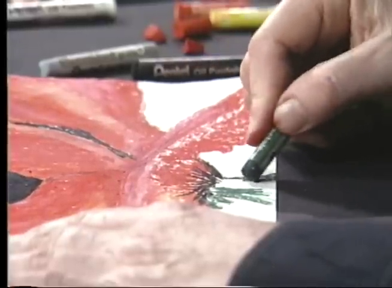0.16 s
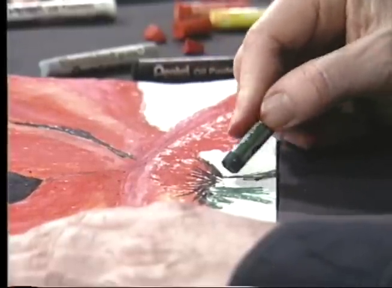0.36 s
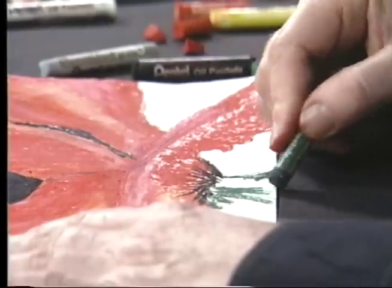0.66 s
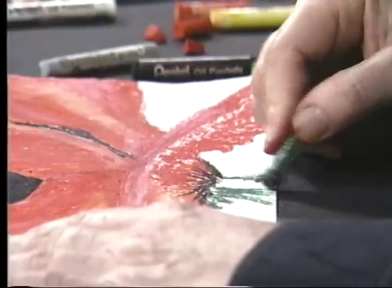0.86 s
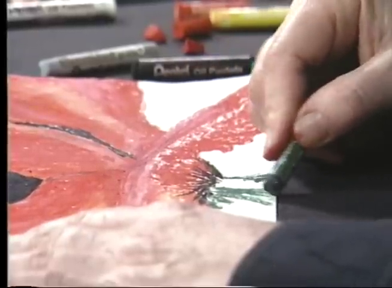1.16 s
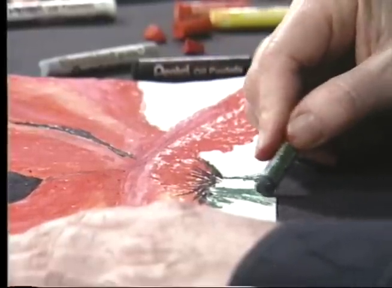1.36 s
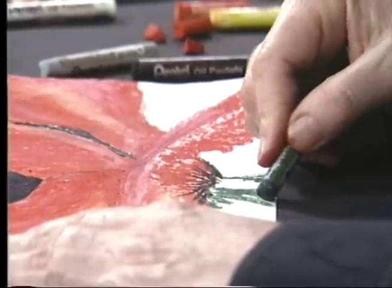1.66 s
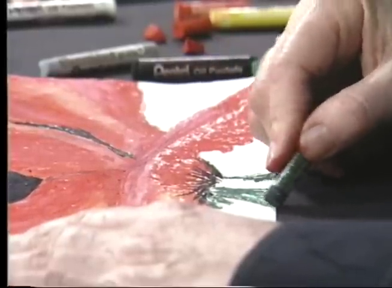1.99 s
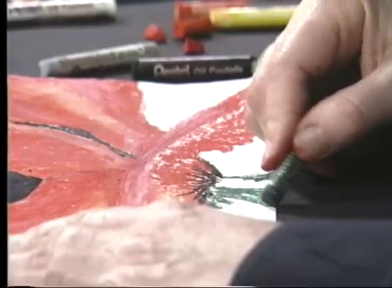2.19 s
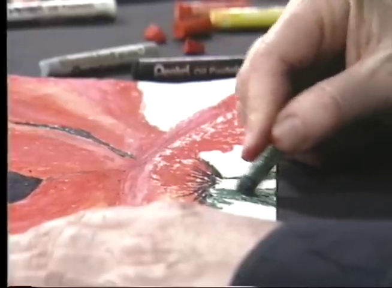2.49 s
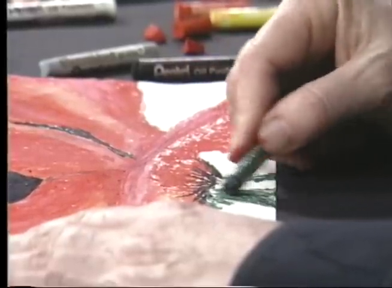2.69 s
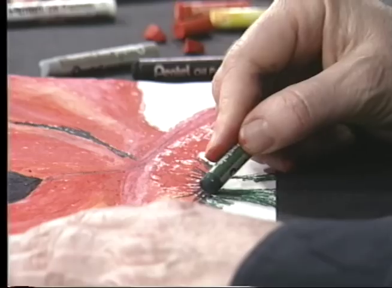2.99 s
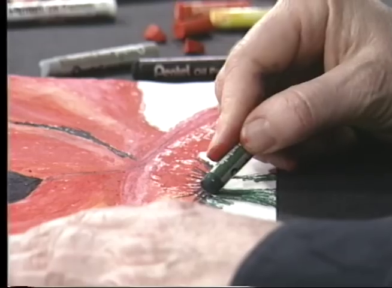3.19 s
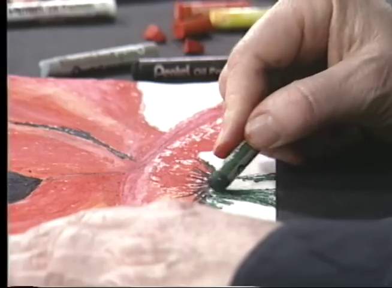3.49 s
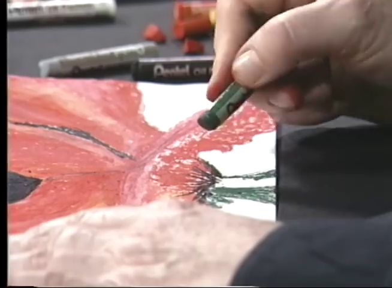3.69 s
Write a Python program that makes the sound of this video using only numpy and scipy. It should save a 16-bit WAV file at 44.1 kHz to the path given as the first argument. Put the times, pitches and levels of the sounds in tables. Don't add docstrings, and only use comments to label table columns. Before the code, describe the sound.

An oil pastel scratches paper in short, quick strokes, with a sharp knock near the first second and a few fainter taps; steady low hum and thin high whistle, one close microphone in a quiet room.

```python
import sys
import numpy as np
from scipy import signal
from scipy.fft import rfft, irfft
from scipy.io import wavfile

SR = 44100
rng = np.random.default_rng(int(sys.argv[2]) if len(sys.argv) > 2 else 0)


def voltage_ratio(level):
    return 10 ** (np.asarray(level, float) / 20)


def transcribe(signal):
    frames = np.atleast_2d(signal).T
    limited = np.clip(frames, -1, 1)
    pcm = np.round(limited * 32767).astype(np.int16)
    wavfile.write(sys.argv[1], SR, pcm)


N = 169785

# frequency_hz, level_db (per Hz)
NOISE_FLOOR = [(15, -87.5), (40, -69.5), (60, -74.5), (70, -77.5), (950, -102.5), (1080, -102.5),
               (3200, -105.5), (15000, -107.5)]
# harmonic_number, level_db (rms)
MAINS_HARMONICS = [(1, -64), (2, -76), (3, -52.7), (4, -85), (5, -61.5), (6, -75), (7, -74), (8, -83),
                   (9, -68.5), (11, -76.5), (13, -78), (15, -71.5), (17, -80), (19, -94), (21, -87),
                   (23, -94), (27, -85), (31, -90), (33, -87), (39, -88), (45, -88), (55, -93), (57, -94)]
# pitch_hz, level_db (rms)
IDLE_TONES = [(86.13, -78), (480, -108), (600, -101), (8991, -102)]
# time_s (the swell peaks 1.2 ms later), level_db
IDLE_BLIPS = [
    (1.962, -60),
    (2.008, -59),
    (2.149, -59),
    (2.171, -59),
    (2.452, -60),
    (2.495, -59),
    (2.592, -60),
    (2.614, -59),
]
# start_s, level_db
HAND_BUMPS = [
    (.095, -48),
    (0.429, -38),
    (1.3, -42),
    (1.389, -39),
    (1.6, -55),
    (2.45, -55),
    (2.748, -65),
    (3.352, -47),
    (3.68, -59),
]
# start_s, level_db, t60_s, low_hz, high_hz
HAND_SHIFTS = [
    (.89, -61.5, 6, 500, 900),
    (.89, -67, 1.5, 1000, 2400),
    (3.55, -68, 6, 400, 1000),
]
# start_s, tick_db, thud_db, brightest_hz, rattle_ms
DESK_TAPS = [
    (.469, -55.5, -64, 616, 3.2),
    (0.8611, -52, -58, 1320, 2.6),
    (.8645, -48.5, -65, 804, 5.9),
    (0.8824, -43.5, -36.5, 2070, .4),
    (1.321, -51.5, -58, 690, 7),
    (1.639, -56, -60, 700, 5.9),
    (1.935, -64, -62, 1620, 2),
    (3.691, -55, -62, 2600, 3),
    (3.708, -56, -64, 1500, 7),
    (3.72, -56, -66, 900, 2.4),
]
# pitch_hz, level_db, t60_s
DESK_MODES = [(430, -2, .022), (580, 0, .025), (720, 1, .025), (940, -2, .018), (1200, -3, .014),
              (1480, -2, .012), (1800, 1, .012), (2150, 0, .010), (2600, -4, .008), (3280, -1, .022),
              (4800, -5, .004)]
# pitch_hz, level_db, t60_s
THUD_MODES = [(65, -3, .08), (110, 0, .07), (230, -5, .025)]
# middle_s, length_s, level_db
STROKES = [(.022, .04, -72), (0.092, .06, -66), (0.16, .05, -67), (.499, .06, -71),
           (0.763, 0.063, -67), (.845, 0.042, -64), (0.92, 0.087, -67), (0.998, 0.068, -62),
           (1.074, 0.067, -68), (1.15, 0.063, -62.5), (1.228, 0.11, -67.5), (1.305, 0.063, -61),
           (1.402, 0.13, -66.5), (1.491, 0.064, -64), (1.562, 0.073, -67), (1.653, 0.061, -63.5),
           (1.758, 0.034, -69), (1.828, 0.06, -64.5), (1.902, .06, -66.5), (1.995, 0.082, -64),
                 (2.085, 0.082, -65), (2.167, 0.059, -63), (2.255, 0.078, -65), (2.338, 0.067, -62.5),
                 (2.438, 0.11, -65), (2.556, 0.062, -61), (2.648, 0.12, -64), (2.758, 0.054, -61),
                 (2.841, 0.071, -63), (2.892, 0.061, -64.5), (3.452, 0.066, -67.5), (3.523, .07, -72),
                 (3.618, 0.096, -66.5), (3.703, 0.064, -64), (3.83, 0.12, -63.5)]
# pitch_hz, width_hz, level_db
PAPER_MODES = [(4950, 460, -2.5), (6100, 1000, 0), (8300, 1100, -5), (11500, 4000, -7), (4300, 850, -9)]
TRACK_OFFSET = [
    [.03249],
    [.04352],
]

MAINS_HZ = 60


def in_hz(points, hz):
    p = np.array(points)
    return np.interp(np.log(hz + 1), np.log(p[:, 0]), p[:, 1])


def rms_one(x):
    return x / np.sqrt(np.mean(x ** 2) + 1e-20)


def drift(rate_hz):
    r = np.exp(-80 * np.pi * rate_hz / SR)
    slow = signal.lfilter([1], [1, -2 * r, r * r], rng.standard_normal(N // 40 + 2002))
    slow = rms_one(slow[2000:])
    return np.interp(np.arange(N) / 40, np.arange(len(slow)), slow)


def ring(x, hz, t60_s):
    r, w = voltage_ratio(-60 / (t60_s * SR)), 2 * np.pi * hz / SR
    return signal.lfilter([0, np.sin(w)], [1, -2 * r * np.cos(w), r * r], x)


def peak(x, hz, width_hz):
    r = np.exp(-np.pi * width_hz / SR)
    zeros = np.array([1, 0, -1]) * (1 - r * r) / 2
    return signal.lfilter(zeros, [1, -2 * r * np.cos(2 * np.pi * hz / SR), r * r], x)


def peak_twice(x, hz, width_hz):
    return peak(peak(x, hz, width_hz), hz, width_hz)


def room_and_tape_noise():
    hz = np.arange(N // 2 + 1) * SR / N
    shaped = rfft(rng.standard_normal(N)) * voltage_ratio(in_hz(NOISE_FLOOR, hz)) * np.sqrt(SR / 2)
    low = 1 / (1 + (hz / 80) ** 4)
    rumble = irfft(shaped * low, N) * voltage_ratio(1.5 * drift(3.7))
    hiss = irfft(shaped * (1 - low), N) * voltage_ratio(0.25 * drift(9))
    return rumble + hiss


def mains_buzz():
    spike_s, smear_rad = .0041, .02
    t = np.arange(N) / SR - spike_s
    out = np.zeros(N)
    for k, db in MAINS_HARMONICS:
        phase = 2 * np.pi * MAINS_HZ * k * t + smear_rad * (k - 5) ** 2
        out += np.sqrt(2) * voltage_ratio(db) * np.cos(phase)
    return out


def line_whine():
    line_hz, flutter_hz, flutter_rate_hz = 15725, 10, 8
    level_db, sideband_db, lump_db, skirt_db = -68, -.5, 2.5, -5
    line_phase = 2 * np.pi * np.cumsum(line_hz + flutter_hz * drift(flutter_rate_hz)) / SR
    side_phase = line_phase - 2 * np.pi * np.cumsum(MAINS_HZ + 6 * drift(10)) / SR
    line = voltage_ratio(lump_db * drift(14)) * np.sin(line_phase)
    side = voltage_ratio(sideband_db + lump_db * drift(5.3)) * np.sin(side_phase)
    skirt = rms_one(peak_twice(rng.standard_normal(N), line_hz - 70, 200))
    return voltage_ratio(level_db) * (np.sqrt(2) * (line + side) + voltage_ratio(skirt_db) * skirt)


def idle_track():
    hiss_db, hiss_low_hz = -80.5, 480
    line_hz, line_db = 15734, -90
    blip_hz, glide_hz_per_s, rise_s, fall_s, lag_s = 150, 3000, .007, .0025, .0012
    t = np.arange(N) / SR
    high_pass = signal.butter(4, hiss_low_hz, "high", fs=SR, output="sos")
    out = voltage_ratio(hiss_db) * signal.sosfilt(high_pass, rng.standard_normal(N))
    for hz, db in IDLE_TONES + [(line_hz, line_db)]:
        out += np.sqrt(2) * voltage_ratio(db) * np.sin(2 * np.pi * hz * t)
    for k, (s, db) in enumerate(IDLE_BLIPS):
        age = t - (s + lag_s)
        swell = np.exp(-.5 * (age / np.where(age < 0, rise_s, fall_s)) ** 2)
        hz = blip_hz + glide_hz_per_s * np.clip(age, -.02, .02)
        out += (-1) ** k * voltage_ratio(db) * swell * np.cos(2 * np.pi * hz * age)
    return out


def hand_bumps():
    clicks = np.full(N, 1e-18)
    s, db = np.transpose(HAND_BUMPS)
    clicks[(s * SR).astype(int)] = voltage_ratio(db)
    soft = np.hanning(300)
    pushes = signal.lfilter(soft / soft.sum(), [1], clicks)
    return ring(pushes, hz=47.4, t60_s=0.1)


def hand_shifts():
    hold_s, onset_s = .4, .02
    t, out = np.arange(N) / SR, np.zeros(N)
    for s, db, t60_s, low_hz, high_hz in HAND_SHIFTS:
        band = signal.butter(2, [low_hz, high_hz], "band", fs=SR, output="sos")
        noise = rms_one(signal.sosfilt(band, rng.standard_normal(N)))
        age = np.maximum(t - s, 0)
        fade_db = -60 * age / t60_s - 40 * np.maximum(age - hold_s, 0)
        out += voltage_ratio(db + fade_db + drift(15)) * (1 - np.exp(-age / onset_s)) * noise
    return out


def desk_taps():
    contact_s, thud_lag_s, slope_db_per_oct2 = .00003, .0012, 6
    out, t = np.zeros(N + SR), np.arange(SR // 4) / SR
    mode_luck_db = rng.normal(0, 1, (len(DESK_TAPS), len(DESK_MODES)))
    rattle_noise = rng.standard_normal((len(DESK_TAPS), len(t)))
    touch = t * np.exp(-t / contact_s)
    touch = touch / touch.sum()
    late_touch = np.roll(touch, int(thud_lag_s * SR))
    thud = -sum(voltage_ratio(db) * ring(late_touch, hz, t60_s) for hz, db, t60_s in THUD_MODES)
    for tap, luck_db, noise in zip(DESK_TAPS, mode_luck_db, rattle_noise):
        s, tick_db, thud_db, brightest_hz, rattle_ms = tap
        rattle = .25 * noise * (np.abs(noise) > 2) * np.exp(-t / (rattle_ms / 1000))
        rattle[0] = 1
        contacts = signal.lfilter(touch[:200], [1], rattle)
        push = signal.lfilter(*signal.butter(2, 1.7 * brightest_hz, fs=SR), contacts)
        tick = np.zeros(len(t))
        for (hz, db, t60_s), own_db in zip(DESK_MODES, luck_db):
            off_pitch_db = slope_db_per_oct2 * np.log2(hz / brightest_hz) ** 2
            tick += voltage_ratio(db + own_db - off_pitch_db) * ring(push, hz, t60_s)
        i = int(s * SR)
        out[i:i + len(t)] += voltage_ratio(tick_db) * tick + voltage_ratio(thud_db) * thud
    return out[:N]


def pastel_strokes():
    grains_per_s, grain_spread_db, judder_db, edge_share = 12000, 1.8, 1.5, 0.99
    t, push = np.arange(N) / SR, np.zeros(N)
    for middle_s, length_s, db in STROKES:
        nearness = 1 - 2 * np.abs(t - middle_s) / (1.35 * length_s)
        rise = np.clip(nearness / edge_share, 0, 1)
        push += voltage_ratio(db) * np.sin(np.pi / 2 * rise) ** 2
    catches = rng.random(N) < grains_per_s / SR
    grains = catches * voltage_ratio(grain_spread_db * rng.exponential(1, N)) * rng.choice([-1, 1], N)
    rub = np.zeros(N)
    for k, (hz, width_hz, db) in enumerate(PAPER_MODES):
        own_grains = np.roll(grains, 999 * k)
        mode = rms_one(peak_twice(own_grains, hz, 1.77 * width_hz))
        rub += voltage_ratio(db + judder_db * drift(29)) * mode
    return push * rms_one(rub)


def scene():
    background = room_and_tape_noise() + mains_buzz() + line_whine()
    hand = hand_bumps() + hand_shifts()
    left = background + hand + desk_taps() + pastel_strokes()
    return np.array([left, idle_track()])


def band_limit(x):
    return signal.sosfilt(signal.butter(12, 16160, fs=SR, output="sos"), x)


def record(dry):
    top_cut = signal.ellip(12, .5, 70, 15790, fs=SR, output="sos")
    mix = signal.sosfilt(top_cut, dry) + np.array(TRACK_OFFSET)
    return band_limit(mix)


dry = scene()
out = record(dry)
transcribe(out)
```